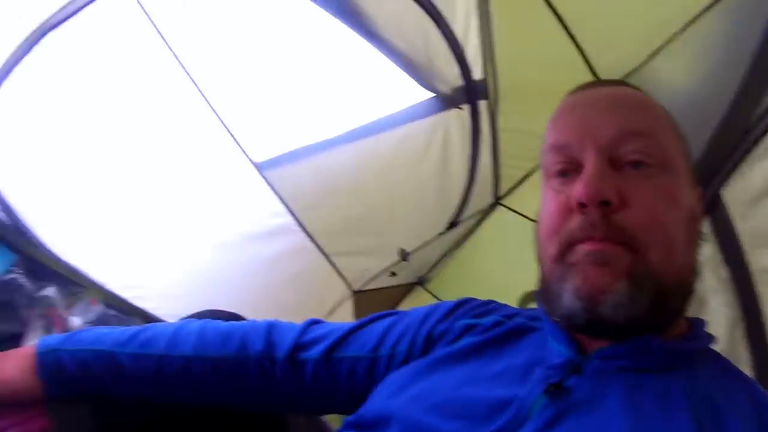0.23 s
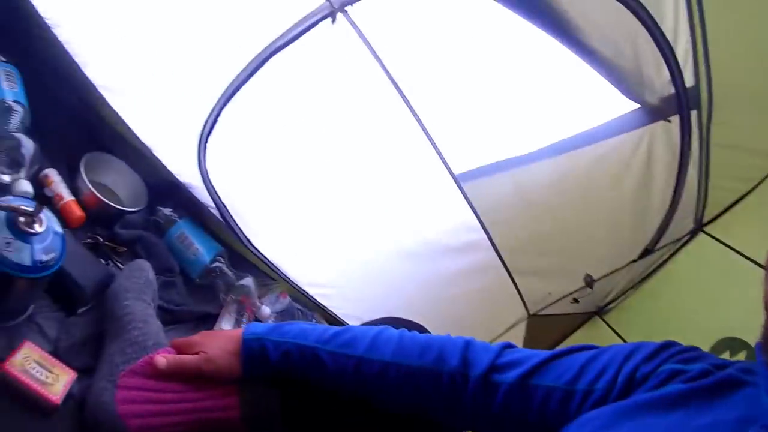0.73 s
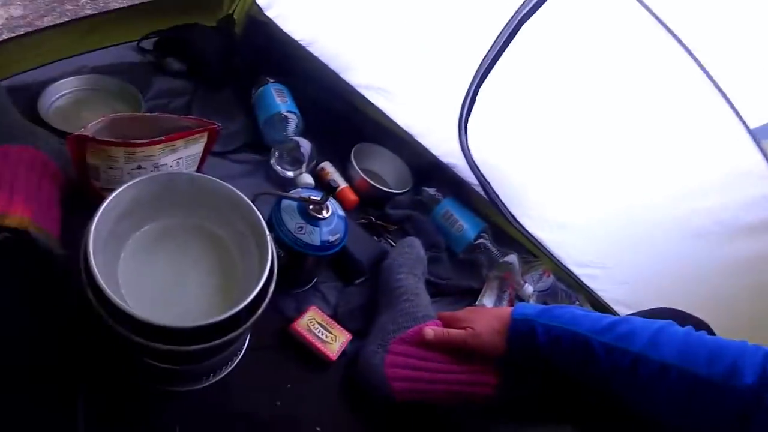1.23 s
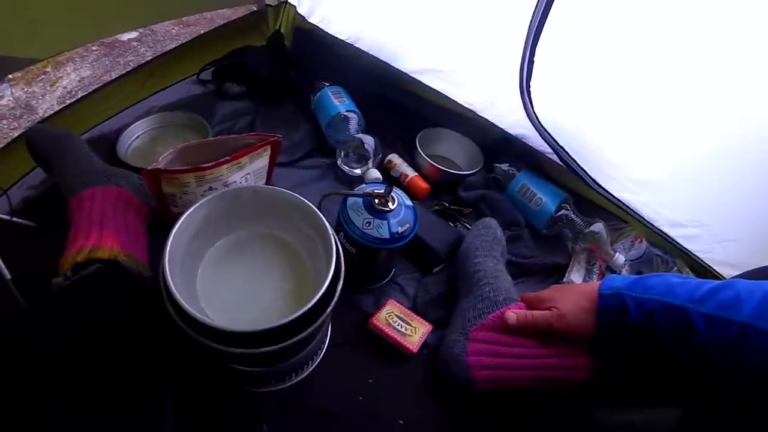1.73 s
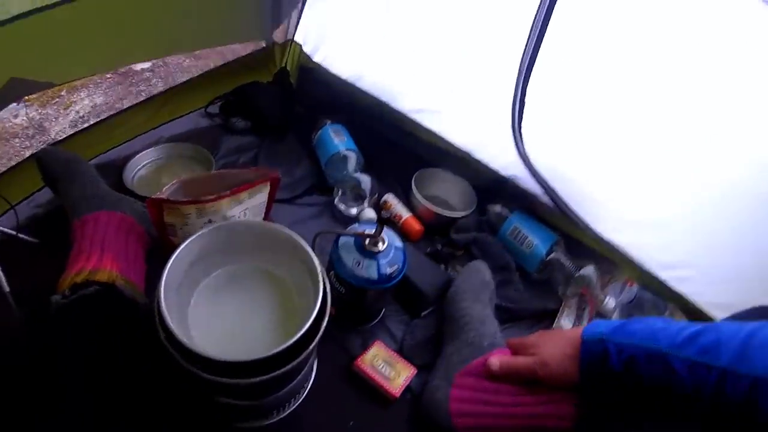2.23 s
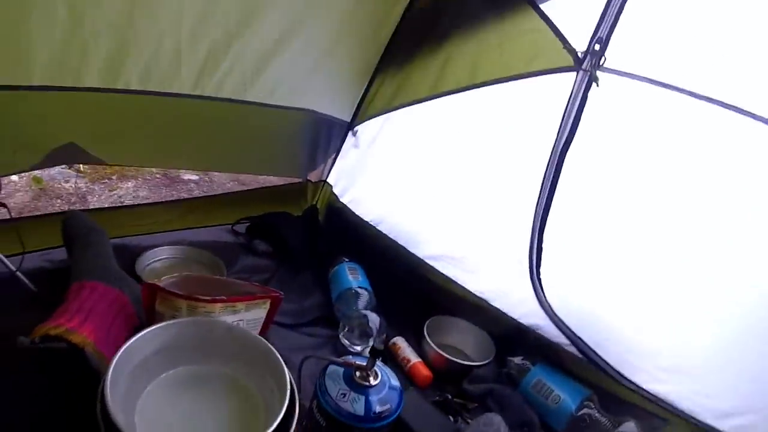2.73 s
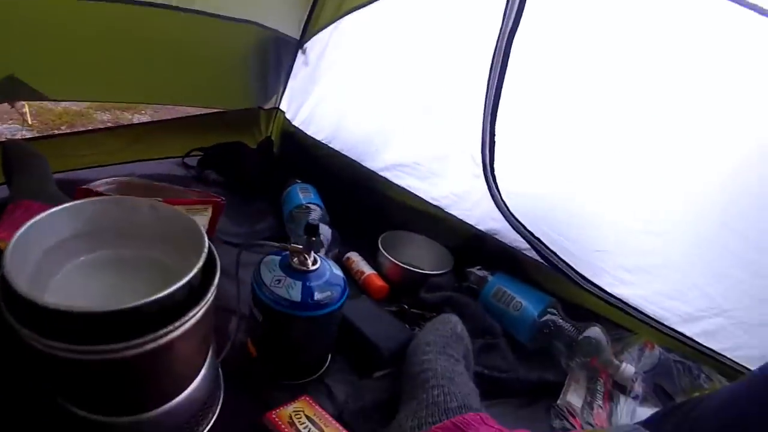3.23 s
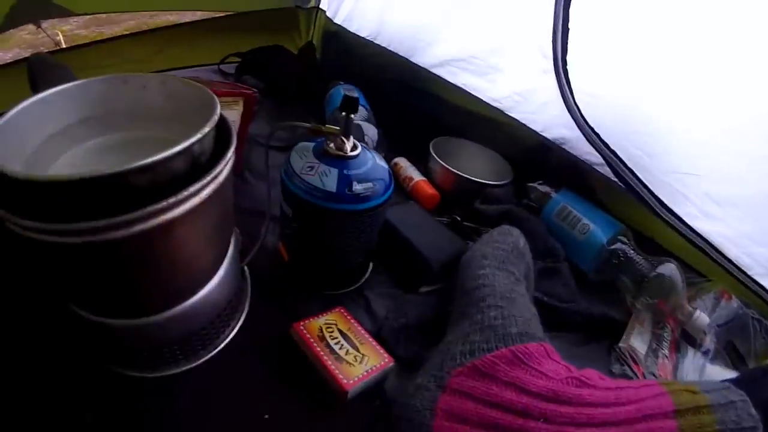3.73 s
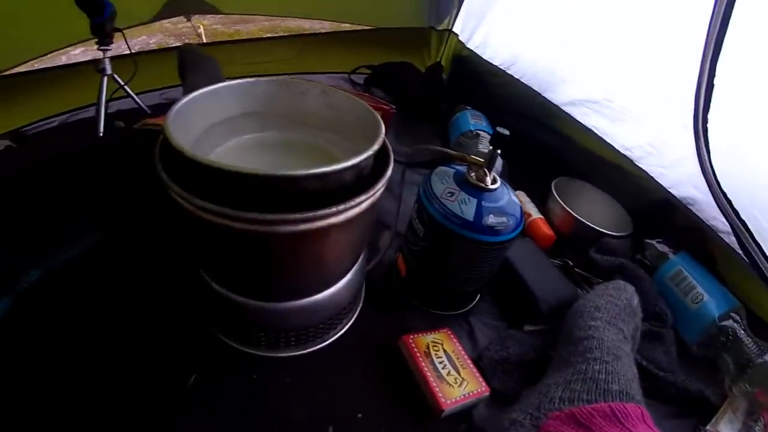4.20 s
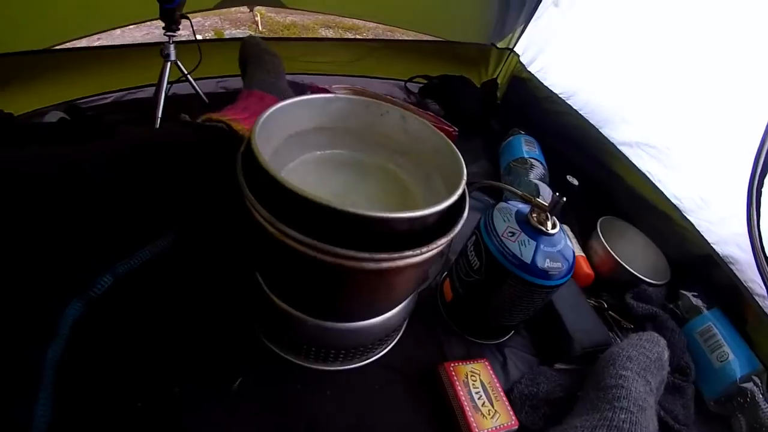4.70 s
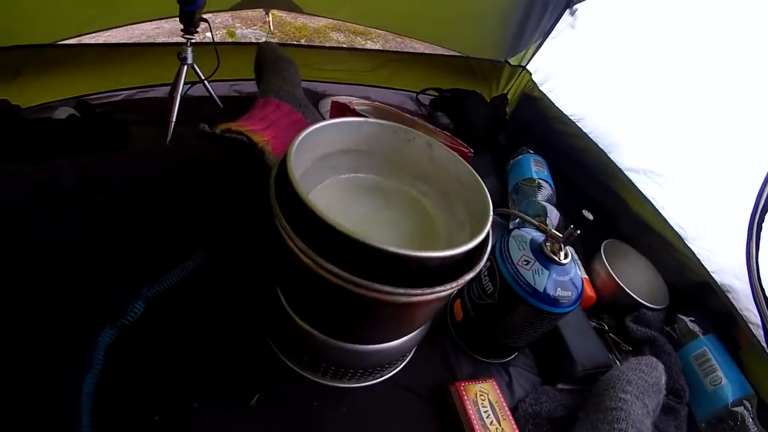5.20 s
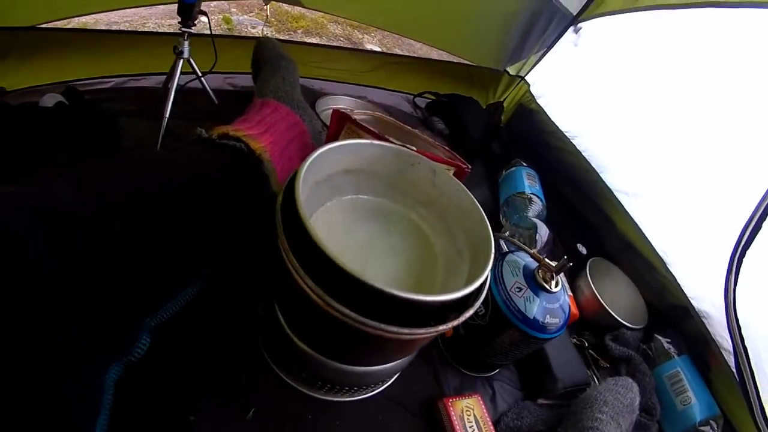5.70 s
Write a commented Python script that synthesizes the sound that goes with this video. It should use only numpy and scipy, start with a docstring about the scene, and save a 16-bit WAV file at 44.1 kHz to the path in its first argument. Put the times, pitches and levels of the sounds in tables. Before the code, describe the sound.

Inside a small tent, a gas burner under a metal pot roars continuously in the left channel, hollow and mid-heavy with a slight flutter. One tiny metallic tick comes just past the middle. The right channel is almost silent: faint hiss, rapid regular electronic clicks and irregular tiny buzz bursts. Close, dry, lopsided camera microphone.

```python
"""Camping gas burner under a pot

On the left a gas flame roars inside its metal windshield: noise heard through the hollow resonances
between burner, shield and pot, over jet noise, flame flutter and faint gated rumble; warming metal
ticks once. The right is nearly silent: faint hiss, and electronics as filtered clicks on a steady
cycle and short bursts of resonant buzz. A thin top hiss lies on both channels."""
import sys
import numpy as np
from scipy import signal
from scipy.fft import rfft, irfft, next_fast_len
from scipy.io import wavfile
from scipy.ndimage import uniform_filter1d, map_coordinates

SR = 44100
rng = np.random.default_rng(int(sys.argv[2]) if len(sys.argv) > 2 else 0)


def materialize(psi):
    """Save the field psi as 16-bit PCM at rate SR to the path in sys.argv[1].

    A 1-D psi becomes a single channel; in a 2-D psi each row is a channel.
    """
    bounded = np.clip(np.atleast_2d(psi).T, -1, 1)
    quanta = np.round(bounded * 32767).astype(np.int16)
    wavfile.write(sys.argv[1], SR, quanta)


N = 262395  # length in samples
UPPER_DB = -45.5  # rms of the shield resonances before gusts; the jet noise is set against it


def undb(db):
    """Turn dB into gain."""
    return 10 ** (np.asarray(db) / 20)


def level(x, db):
    """Scale a sound to an rms level in dB."""
    return x * undb(db) / np.sqrt(np.mean(x ** 2))


def walk(count):
    """Wandering control signal: count random levels a second, smoothed twice, rms 1."""
    hold = SR // count
    steps = np.repeat(rng.standard_normal(N // hold + 1), hold)
    smooth = uniform_filter1d(uniform_filter1d(steps, hold), hold)
    return level(smooth[:N], 0)


def noise(gain):
    """Fresh white noise shaped in the spectrum by gain(Hz)."""
    size = next_fast_len(N)
    hz = np.arange(size // 2 + 1) * SR / size + 1e-3  # the offset avoids dividing by zero
    return irfft(gain(hz) * rfft(rng.standard_normal(size)), size)[:N]


def coloured(points, shared_db, flicker_db, count, order=1):
    """Noise of a (Hz, dB) spectrum whose bands, order to the octave, swell together and flicker alone."""
    hz, db = np.transpose(points)
    first, last = int(order * np.log2(hz[0])), int(order * np.log2(hz[-1])) + 1
    out = 0
    for band in range(first, last + 1):
        def gain(f):
            # neighbouring bands crossfade at equal power
            share = np.cos(np.pi / 2 * np.clip(order * np.log2(f) - band, -1, 1))
            return share * undb(np.interp(np.log(f), np.log(hz), db)) * (f < hz[-1])
        out = out + noise(gain) * undb(flicker_db * walk(count))
    return out * undb(shared_db * walk(count))


def resonant(modes, steep, flicker_db, count):
    """Noise through (Hz, width, dB) resonances, each flickering alone; steep sets how fast skirts fall."""
    out = 0
    for hz, width, db in modes:
        def gain(f):
            return (1 + ((f - hz ** 2 / f) / width) ** 2) ** -steep
        out = out + undb(db + flicker_db * walk(count)) * noise(gain)
    return out


def swayed(x, hz):
    """A resonance drifts slightly in pitch and wanders in level, the high ones most in level."""
    pitch_share, db_per_khz = .004, 0.3949  # rms sway of playback speed and of level
    read_at = np.arange(N) + np.cumsum(pitch_share * walk(count=2))
    drifted = map_coordinates(x, [read_at], mode="mirror")
    return drifted * undb(db_per_khz * hz / 1000 * walk(count=3))


def cavity_roar():
    """Turbulent burning excites the air cavities under the pot, and flame strength sets the level."""
    # Air cavities. Each row: resonance in Hz, width in Hz, relative level in dB.
    cavities = [(390.7, 123, -3), (453.7, 110, -3), (523, 162, -5.5), (631.5, 122, -4.5), (707, 143, -13)]
    # Flame strength. Each row: time in seconds, roar level in dB before gusts.
    strength = [(0, -27), (.6, -25.5), (1.3, -25.5), (1.7, -24), (2.5, -25.5), (3.5, -26), (4.3, -24.5),
                (5.2, -25.5), (5.95, -25.5)]
    roar = level(resonant(cavities, steep=1.234, flicker_db=0.03, count=20), 0)
    return roar * undb(np.interp(np.arange(N) / SR, *np.transpose(strength)))


def shield_resonances():
    """Burning noise rings the higher resonances of shield and burner holes, each swaying alone."""
    # Shield and burner holes. Each row: resonance in Hz, width in Hz, relative level in dB.
    shield_modes = [(1005, 340, -2.5), (1158, 160, 1), (1320, 66, 2.5), (1418, 89, -4.5), (1686, 300, -8.5),
                    (2055, 230, -7.5), (2182, 76, -7.5), (2640, 65, -19.5), (2833, 190, -14.5),
                    (3010, 170, -14), (3410, 120, -21.5), (4025, 170, -18.5), (4646, 93, -20.5),
                    (4330, 200, -27.5), (5220, 160, -24.5), (5410, 130, -24), (5545, 110, -23),
                    (6780, 250, -33.5), (6970, 250, -32), (7170, 150, -32), (7470, 270, -32.5),
                    (7730, 210, -30), (7850, 150, -36)]
    out = 0
    for mode in shield_modes:
        ringing = resonant([mode], steep=1.0, flicker_db=1.57, count=30)
        out = out + swayed(ringing, mode[0])
    return level(out, UPPER_DB)


def jet_noise():
    """Gas jet turbulence fills the space between the resonances with broad noise."""
    # Jet spectrum. Each row: frequency in Hz, relative density in dB.
    jet_spectrum = [(700, -24.5), (900, -1.5), (1500, -11.5), (2400, -18.5), (3600, -25), (5000, -30),
                    (6300, -35.5), (7800, -44.5), (8400, -42.5), (10000, -60)]
    jet = coloured(jet_spectrum, shared_db=0.5, flicker_db=1.5, count=12, order=5)
    return level(jet, UPPER_DB - 2.5)


def flame_flutter():
    """The flame flutters as low noise, mostly below the cavity resonances."""
    # Flutter spectrum. Each row: frequency in Hz, relative density in dB.
    flutter_spectrum = [(90, -49.5), (125, -25.5), (150, -12), (210, -2), (270, -5.5), (330, -6),
                        (400, -28)]
    return level(coloured(flutter_spectrum, shared_db=0.7, flicker_db=1.1, count=12), -51.5)


def rumble():
    """Very faint deep noise, switched on and off by a random gate and a table of gaps."""
    # Rumble spectrum. Each row: frequency in Hz, relative density in dB.
    rumble_spectrum = [(15, 2), (40, 1), (110, 1.5), (140, 0.5), (200, -40)]
    # Gaps. Each row: start in seconds, length in seconds, both at the middle of the edges.
    gaps = [(0.54, 0.26), (0.857, .05), (1.069, 0.054), (1.168, 0.037), (1.428, 0.044), (1.753, 0.055),
            (2.009, 0.044), (2.127, 0.061), (2.235, 0.054), (2.41, .04), (2.715, .09), (2.934, 0.046),
            (3.264, .1), (3.454, .035), (3.555, .055), (3.668, .055), (3.773, .075), (3.963, .035),
            (4.135, .045), (4.366, .03), (4.646, .04), (4.8, 0.11), (5.017, 0.13), (5.508, 0.16),
            (5.724, .19)]
    edge_s = .02
    t = np.arange(N) / SR
    # soft gate, closed while the walk is below -1.3
    present = 1 / (1 + np.exp(-8.0 * (walk(count=44) + 1.3)))
    for start, length in gaps:
        outside = np.abs(t - start - length / 2) - length / 2
        present = present * np.clip(outside / edge_s + .5, 0, 1)
    deep = coloured(rumble_spectrum, shared_db=0.5, flicker_db=1.5, count=20)
    return level(present * deep, -64.5)


def burner():
    """Gusts surge shield and jet together; the roar follows a little, with a slower drift of its own."""
    upper_gust_db, roar_gust_db = 0.48, 0.1  # rms per walk
    gust = walk(count=30)
    roar = cavity_roar() * undb(roar_gust_db * (gust + walk(count=8)))
    upper = (shield_resonances() + jet_noise()) * undb(upper_gust_db * gust)
    return roar + upper + flame_flutter() + rumble()


def metal_ticks():
    """Warming metal slips with a noise snap: its sine modes swell and die within milliseconds."""
    # Slips. Each row: start in seconds, peak of the ringing in dB.
    slips = [(3.3766, -34.5)]
    # Metal modes. Each row: frequency in Hz, relative level in dB, spread of the swell and fade in seconds.
    metal_modes = [(2890, -14, .0015), (3280, -11, .0015), (3660, -16, .0012), (4650, 1, 0.0021),
                   (4880, -14, .0015), (5440, -13, 0.0017)]
    swells = 1.7  # a mode peaks this many spreads after the slip
    snap_db, snap_s = -54, .003  # gain before filtering, time to the envelope's peak
    t = np.arange(SR // 20) / SR
    ring = 0
    for hz, db, spread in metal_modes:
        swell = np.exp(-.5 * ((t - swells * spread) / spread) ** 2)
        ring = ring + undb(db) * np.sin(2 * np.pi * (hz * t + rng.random())) * swell
    bright = np.diff(rng.standard_normal(len(t) + 1))
    snap = undb(snap_db) * bright * t / snap_s * np.exp(-t / snap_s)
    band = signal.butter(2, [2500, 10000], "bandpass", fs=SR, output="sos")
    snap = signal.sosfilt(band, snap)
    out = np.zeros(N)
    for start, db in slips:
        first = int(start * SR)
        out[first:first + len(t)] += undb(db) * ring / np.abs(ring).max() + snap
    return out


def electronic_clicks():
    """Electrical pulses repeat on a steady cycle, slightly loose in time and level, through a band-pass."""
    # Clicks in every cycle. Each row: seconds into the cycle, typical peak in dB.
    cycle_clicks = [(.0005, -56.5), (.0086, -53.5), (.0133, -59.5), (.0172, -60.5)]
    # Looser clicks once in three cycles. Each row: seconds into the group, typical peak in dB.
    group_clicks = [(.029, -55), (.0333, -54), (.0372, -50)]
    cycle_s, cycle_jitter_s, group_jitter_s = .04, 0.0002, 0.00034
    pulses = np.zeros(N)
    for clicks, period, jitter in ((cycle_clicks, cycle_s, cycle_jitter_s),
                                   (group_clicks, 3 * cycle_s, group_jitter_s)):
        starts = np.arange(0, N / SR, period)
        for offset, db in clicks:
            time_chance, level_chance = rng.standard_normal((2, len(starts)))
            at = ((starts + offset + jitter * time_chance) * SR).astype(int)
            pulses[np.clip(at, 0, N - 1)] += undb(db + 1.5 * level_chance)
    band = signal.butter(3, [295, 900], "bandpass", fs=SR, output="sos")
    unit_click = signal.sosfilt(band, np.arange(SR // 100) == 0)
    return signal.sosfilt(band, pulses) / unit_click.max()


def electronic_buzz():
    """Narrow lines over a broad hump of noise leak through in short bell-shaped bursts."""
    # Bursts. Each row: centre in seconds, spread in seconds, rms at the centre in dB.
    bursts = [(0.012, 0.004, -56), (0.035, 0.006, -57), (0.152, 0.011, -58), (0.185, 0.01, -57.5),
              (0.275, 0.004, -61), (0.313, 0.007, -56), (0.386, 0.0097, -56), (0.426, 0.009, -60),
              (0.51, 0.0079, -54), (0.55, 0.008, -61), (0.677, 0.006, -60), (0.749, 0.01, -58),
              (0.787, 0.006, -58), (0.951, 0.014, -52), (0.998, 0.0086, -56), (1.032, 0.014, -56),
              (1.147, 0.007, -59), (1.236, 0.006, -55), (1.275, 0.007, -58), (1.388, 0.006, -59),
              (1.467, 0.007, -55), (1.515, 0.007, -58), (1.593, 0.006, -52.5), (1.646, 0.013, -63),
              (1.715, 0.009, -57), (1.839, 0.009, -55), (1.934, 0.005, -55), (1.981, 0.005, -55),
              (2.07, 0.008, -56), (2.195, 0.005, -60), (2.241, 0.013, -55), (2.317, 0.007, -57),
              (2.47, 0.006, -58), (2.555, 0.006, -61), (2.598, 0.01, -59), (2.677, 0.005, -56),
              (2.849, 0.009, -56), (2.876, 0.007, -56), (2.955, 0.017, -60), (3.061, 0.007, -57),
              (3.156, 0.0076, -53), (3.195, 0.005, -57), (3.302, 0.008, -59), (3.39, 0.009, -59),
              (3.436, 0.016, -53), (3.514, 0.007, -55), (3.636, 0.0046, -56), (3.666, 0.007, -53),
              (3.755, 0.014, -54), (3.928, 0.007, -57), (4.039, 0.015, -51), (4.122, 0.007, -59),
              (4.236, 0.006, -57), (4.265, 0.008, -53), (4.354, 0.005, -59), (4.391, 0.008, -58),
              (4.475, 0.006, -57), (4.595, 0.005, -54), (4.638, 0.015, -55), (4.71, 0.006, -58),
              (4.756, 0.007, -54), (4.954, 0.012, -52), (4.981, 0.005, -58), (5.083, 0.013, -62),
              (5.191, 0.0074, -50), (5.245, 0.011, -52), (5.307, 0.009, -53), (5.352, 0.007, -57),
              (5.434, 0.0054, -53), (5.477, 0.005, -53), (5.583, 0.007, -53), (5.67, 0.007, -56),
              (5.728, 0.008, -57), (5.793, 0.006, -59), (5.825, 0.004, -54), (5.848, 0.006, -53)]
    # Buzz lines and hump. Each row: frequency in Hz, width in Hz, relative level in dB.
    buzz_lines = [(346, 40, -8), (686, 46, -6.5), (1016, 50, 2.5), (1480, 40, -4.5), (1725, 34, -6),
                  (1960, 60, -11), (2420, 50, -16), (2840, 40, -13.5), (4220, 40, -23.5), (5598, 40, -18.5),
                  (1300, 1000, -11.5)]
    t = np.arange(N) / SR
    gate = sum(undb(db) * np.exp(-.5 * ((t - centre) / spread) ** 2) for centre, spread, db in bursts)
    return gate * level(resonant(buzz_lines, steep=2.3, flicker_db=0.5, count=60), 0)


def faint_hiss():
    """Faint broad noise, fullest in the low mids, with quickly flickering octaves."""
    # Hiss spectrum. Each row: frequency in Hz, relative density in dB.
    hiss_spectrum = [(20, -29), (110, -23), (280, -4.5), (400, -0.5), (700, -5), (1050, -1), (1500, -4),
                     (2500, -7.5), (4000, -14.5), (7000, -20.5), (9500, -28), (12000, -34), (15300, -40)]
    return level(coloured(hiss_spectrum, shared_db=0.8, flicker_db=1.5, count=40), -61)


def top_hiss(shared_db, flicker_db, rms_db):
    """Very thin treble noise whose narrow bands flicker."""
    # Treble spectrum. Each row: frequency in Hz, relative density in dB.
    treble_spectrum = [(6500, -31.5), (8500, -2), (10500, -5.5), (11500, -5.5), (12400, -4.5), (13200, -9),
                       (14000, -5.5), (14500, -14.5), (15300, -16)]
    return level(coloured(treble_spectrum, shared_db, flicker_db, count=50, order=12), rms_db)


def scene():
    """Burner and tick on the left, faint hiss and electronics on the right, one top hiss on both."""
    both_top = top_hiss(shared_db=1.0, flicker_db=4.5, rms_db=-84)
    left_top = top_hiss(shared_db=0.5, flicker_db=2.5, rms_db=-86.5)
    left = burner() + metal_ticks() + left_top + both_top
    right = faint_hiss() + electronic_clicks() + electronic_buzz() + both_top
    return np.array([left, right])


def record(dry):
    """A steep elliptic low-pass cuts everything above 15.38 kHz."""
    low_pass = signal.ellip(10, .2, 80, 15380, fs=SR, output="sos")
    return signal.sosfilt(low_pass, dry)


dry = scene()
out = record(dry)
materialize(out)
```